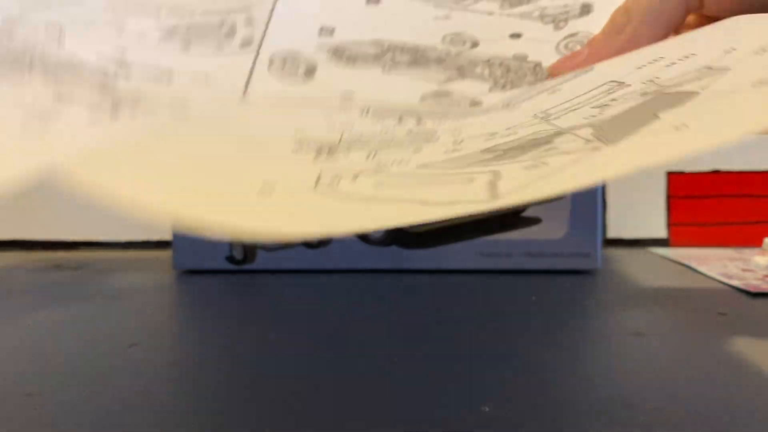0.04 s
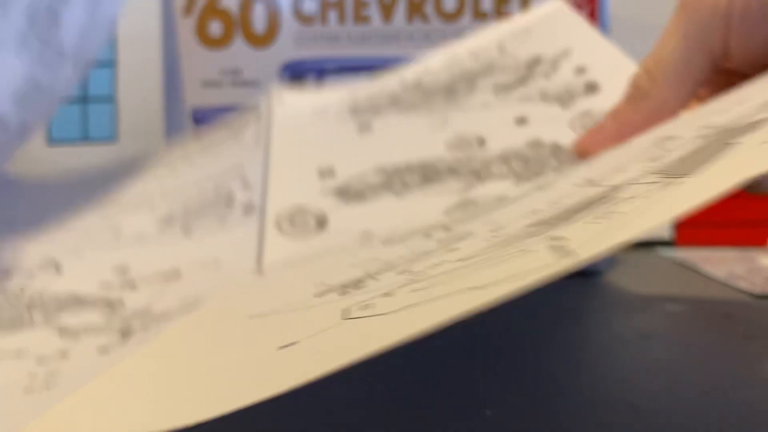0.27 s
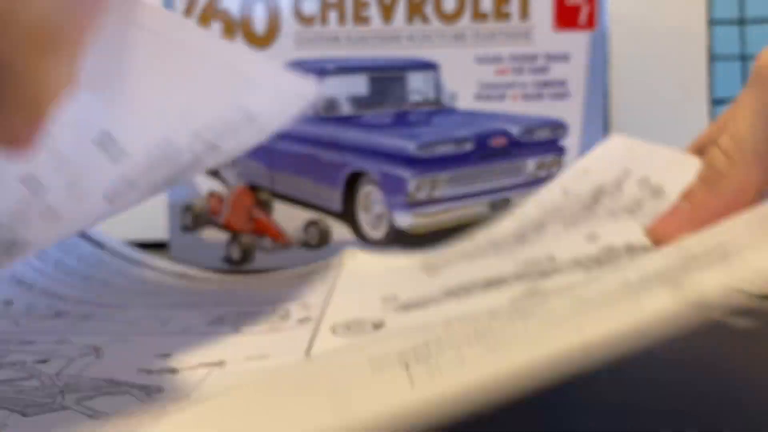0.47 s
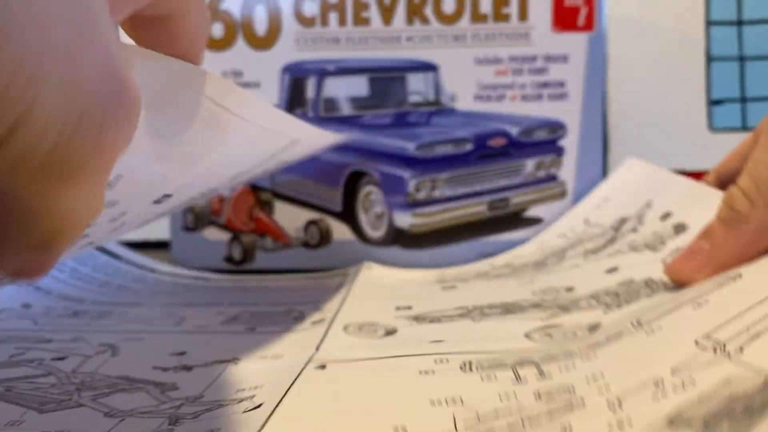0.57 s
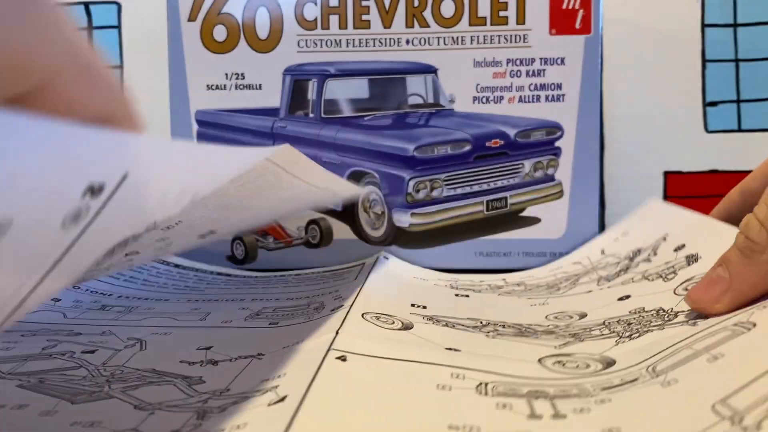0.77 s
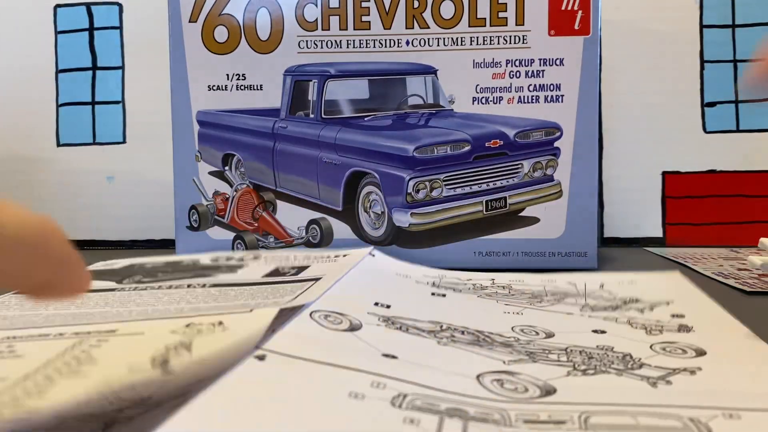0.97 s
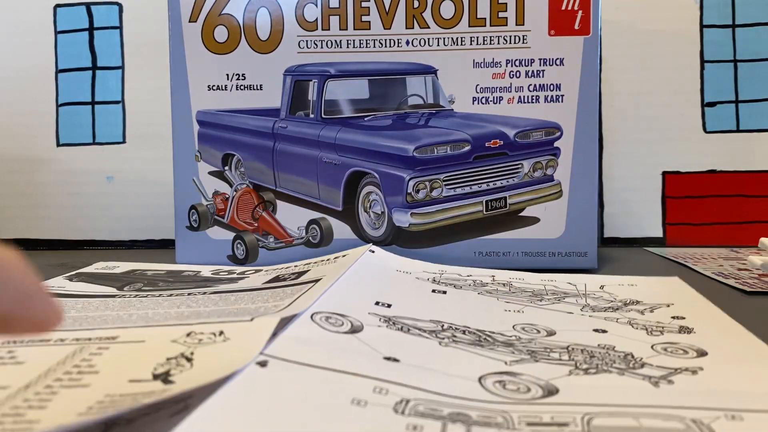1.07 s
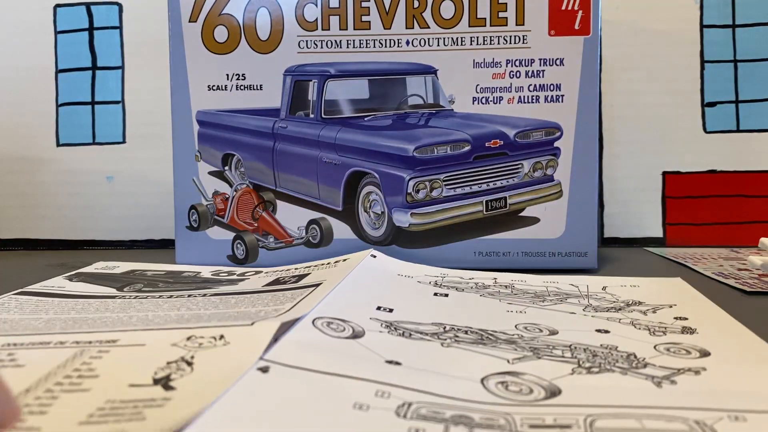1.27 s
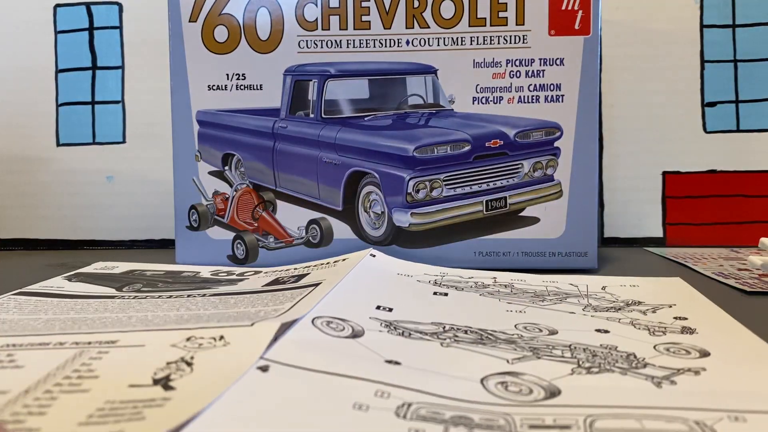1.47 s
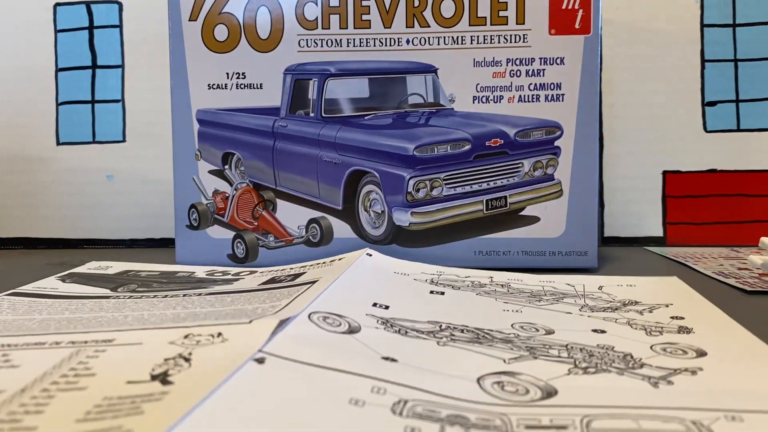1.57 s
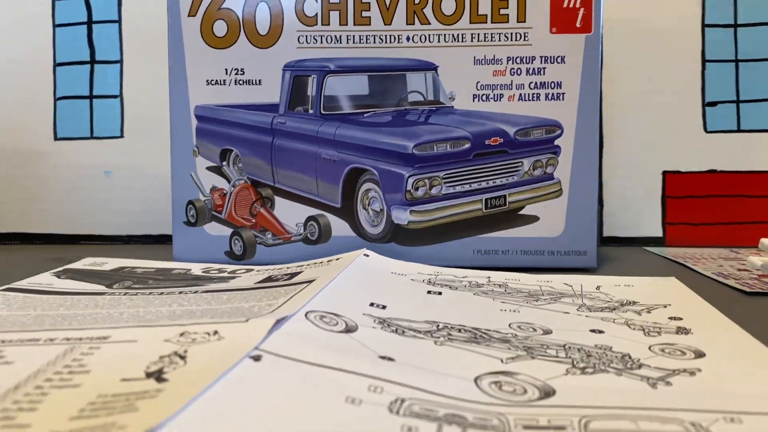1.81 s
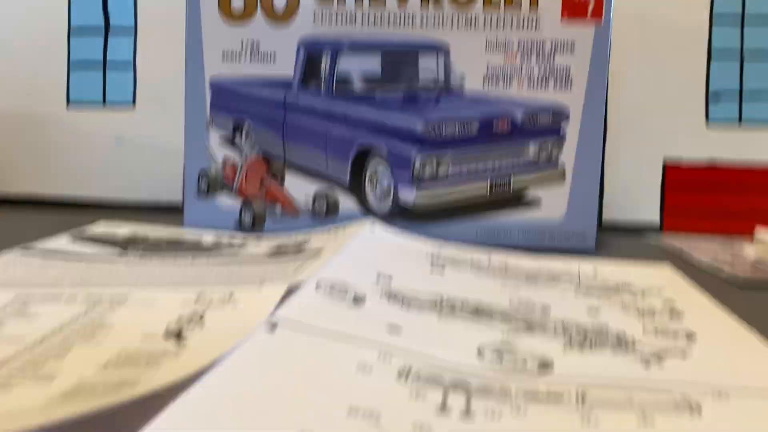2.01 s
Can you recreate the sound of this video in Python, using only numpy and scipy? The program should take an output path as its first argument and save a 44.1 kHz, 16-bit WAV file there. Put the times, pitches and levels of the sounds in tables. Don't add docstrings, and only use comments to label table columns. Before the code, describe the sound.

A stiff folded paper sheet is unfolded close to the microphones, with hissing slides, flapping slaps, crease snaps and low table thuds, then thin settling ticks and a brief last rustle in a quiet small room.

```python
import sys
import numpy as np
from scipy import signal
from scipy.fft import rfft, irfft
from scipy.io import wavfile
from scipy.ndimage import uniform_filter1d

SR = 44100
rng = np.random.default_rng(int(sys.argv[2]) if len(sys.argv) > 2 else 0)


def makeup_ratio(level_db):
    decades = np.asarray(level_db, float) / 20
    return 10 ** decades


def to_wav(sig):
    pcm = np.clip(np.atleast_2d(sig), -1, 1) * 32767
    pcm = np.round(pcm).astype(np.int16)
    wavfile.write(sys.argv[1], SR, pcm.T)


N = 90404
HZ = np.fft.rfftfreq(N, 1 / SR)
T = np.arange(N) / SR


def evened(x):
    return x / np.sqrt(np.mean(x ** 2) + 1e-20)


def read(points, hz):
    f, value = np.transpose(points)
    return np.interp(np.log(hz + 1), np.log(f + 1), value)


def follow(curve, share):
    s, db = np.transpose(curve)[:2]
    return makeup_ratio(db.max() + share * (np.interp(T, s, db) - db.max()))


# (time [s], left over right [dB])
LEAN = [
    (0, 5),
    (1.3, 10),
    (1.55, 1.5),
    (2.05, 0.5),
]


def lean(width):
    return makeup_ratio(width * np.outer([.5, -.5], np.interp(T, *np.transpose(LEAN))))


def add(mix, s, sound, width=0.68):
    pan_db = width * np.interp(s, *np.transpose(LEAN))
    part = mix[:, round(s * SR):][:, :sound.shape[-1]]
    part += sound[..., :part.shape[1]] * makeup_ratio(np.array([[pan_db / 2], [-pan_db / 2]]))


# (frequency [Hz], coherence [0-1])
SAME = [(60, 1), (150, 0.77), (400, 0.68), (1000, 0.077), (2500, 0.5), (5000, 0.48)]


def grains(colour, per_s, spread_db, clump_db, clump_s):
    clump = evened(uniform_filter1d(rng.standard_normal(N), size=max(int(clump_s * SR), 1)))
    size_db = spread_db * np.minimum(rng.exponential(1, N), 4) + clump_db * clump
    size = makeup_ratio(size_db) * (rng.random(N) < per_s / SR)
    left, other = rfft(size * rng.standard_normal((2, N)))
    same = np.clip(read(SAME, HZ), 0, 1)
    right = same * left + np.sqrt(1 - same ** 2) * other
    return evened(irfft(np.array([left, right]) * makeup_ratio(read(colour, HZ)), N))


# (frequency [Hz], level [dB])
AIR = [(30, -17), (70, 29), (150, 3), (350, -57), (1200, -16), (3500, 11), (7000, 0), (16000, -23)]


def room_air():
    return makeup_ratio(-65) * grains(AIR, per_s=SR, spread_db=0, clump_db=.7, clump_s=.05)


# (time [s], length [s], change [dB])
JERKS = [(.028, 0.013, 2), (0.099, 0.013, 3), (.118, 0.032, -6.5), (0.15, 0.011, 0), (.165, 0.026, -4),
         (0.196, 0.0083, 7), (0.217, 0.011, -6.5), (0.232, 0.017, 4), (0.272, 0.011, 3.5),
         (0.295, 0.015, -6), (0.342, .04, 2), (0.419, 0.024, 5), (0.461, 0.051, -5), (0.508, 0.011, -6),
         (0.543, .03, 2), (0.69, 0.023, 0.5), (0.711, 0.018, -6), (0.743, 0.012, -0.5), (0.871, 0.05, -1.5),
         (0.902, 0.026, 5), (1.001, 0.0069, 3.5), (1.55, 0.042, -4.5), (1.594, 0.05, -1),
         (1.695, 0.013, -3.5), (1.715, .012, 5.5), (1.965, 0.015, 3)]


def jerks():
    change_db = 0
    for s, length, db in JERKS:
        inside_s = np.minimum(T - s, s + length - T)
        change_db = change_db + db * np.clip(inside_s / .003 + .5, 0, 1)
    return makeup_ratio(change_db)


# (time [s], level [dB], brightness [dB per octave])
SLIDE = [(0, -55.5, -6.5), (.05, -50.5, -2.5), (.33, -48, -0.5), (.355, -44.5, 0), (.44, -45, -1),
         (.62, -45, -3), (.7, -43, 0), (.84, -41, -2), (.89, -46, -1), (.93, -46, -3.5), (.95, -53.5, -2),
         (1.15, -65, -2), (1.51, -54.5, -3), (1.58, -53.5, -3.5), (1.63, -48, -3), (1.74, -57, -6),
         (1.79, -73, -9.5), (1.89, -55, -0.5)]
# (frequency [Hz], level [dB])
HISS = [(300, -2), (900, -1), (1500, -3.5), (2300, 1), (3500, 0.5), (7000, -1.5), (10000, -2), (16000, -8)]


def slide():
    hiss = grains(HISS, per_s=20000, spread_db=1.8, clump_db=1.5, clump_s=.01)
    hz, t, z = signal.stft(hiss, SR, nperseg=256)
    patches = rng.standard_normal((len(t), len(hz))).T
    patches = uniform_filter1d(patches, size=9, axis=0)
    patches = evened(uniform_filter1d(patches, size=14, axis=1))
    s, _, brightness = np.transpose(SLIDE)
    octaves = np.log2(np.maximum(hz, 1000) / 5000)[:, None]
    tilt_db = np.interp(t, s, brightness) * octaves
    hiss = signal.istft(z * makeup_ratio(1.9 * patches + tilt_db), SR, nperseg=256)[1][:, :N]
    return makeup_ratio(3) * follow(SLIDE, 1.141) * jerks() * lean(0.49) * hiss


# (time [s], level [dB])
BEND = [(0, -68), (.16, -36.5), (.33, -40.5), (.41, -29), (.62, -55.5), (.72, -25.5), (.84, -42.5),
        (1.02, -38), (1.1, -62.5), (1.54, -52), (1.64, -37.5), (1.78, -41), (1.84, -57), (1.93, -38),
        (2.05, -65)]
# (frequency [Hz], level [dB])
DRUM = [(28, -35), (45, 0), (72, -1.5), (150, -6), (400, -18), (800, -21.5), (1500, -35.5), (4000, -53)]


def bend():
    drum = grains(DRUM, per_s=8000, spread_db=1.5, clump_db=2.5, clump_s=.025)
    return makeup_ratio(-3.5) * follow(BEND, 1.097) * lean(0.32) * drum


# (time [s], level [dB], length [s], crispness [dB])
FLAPS = [(0.051, -41, 0.074, -9.5), (0.207, -39.5, 0.026, -24), (0.343, -37.5, 0.029, -8),
         (0.383, -28.5, 0.024, -1.5), (0.442, -35, 0.024, 2), (0.481, -30, 0.041, -2.5),
         (0.626, -33, 0.011, -6), (0.666, -34, 0.012, -3), (0.687, -27, 0.026, 2),
         (0.739, -31.5, 0.014, 0.5), (0.848, -35, 0.013, -14), (0.906, -41, 0.027, 5.5),
         (0.95, -40, 0.015, -36), (1.278, -33.5, 0.014, -12), (1.608, -44.5, 0.048, 6),
         (1.716, -43, 0.029, -2.5), (1.874, -44, 0.019, -3), (1.952, -44.5, 0.015, -8)]
# (frequency [Hz], level [dB])
SLAP = [(80, -6), (200, 1), (400, 2), (700, -1.5), (1200, -8.5), (2500, -18.5), (16000, -80)]
# (frequency [Hz], level [dB])
CRISP = [(700, -89), (1500, -1.5), (2300, 4.5), (3300, -9), (5000, -6.5), (16000, -22.5)]


def flaps():
    slap = grains(SLAP, per_s=6000, spread_db=1.3, clump_db=2, clump_s=.004)
    crisp = grains(CRISP, per_s=9000, spread_db=1.8, clump_db=2.5, clump_s=.003)
    out, t = np.zeros((2, N)), np.arange(3500) / SR
    for s, db, length, crisp_db in FLAPS:
        fall_db = -4 * t / length - 400 * np.maximum(t - length, 0)
        shape = np.minimum(t / 0.0045, 1) * makeup_ratio(fall_db)
        at = round(max(s, 0) * SR)
        dull = evened(slap[:, at:at + 3500])
        crackle = makeup_ratio(crisp_db - 5) * evened(crisp[:, at:at + 3500])
        add(out, max(s, 0), makeup_ratio(db) * shape * (dull + crackle))
    return out


# (time [s], peak [dB], ring [Hz], length [s], clean ring share [0-1])
SNAPS = [(0.054, -37, 1070, .006, 0.8), (0.208, -32.5, 3510, 0.0036, 0.6),
         (0.208, -25.5, 2290, 0.0056, 0.97), (0.301, -26.5, 1085, 0.0096, 0.32),
         (.302, -35, 506, 0.0045, 0.05), (.392, -21.5, 2130, 0.0076, 0.38), (.479, -18, 2150, 0.0058, 0.5),
         (0.634, -36, 1580, 0.0039, 0.8), (0.856, -28.5, 2450, 0.0022, 0.8), (.858, -25, 430, 0.0045, .5),
         (0.925, -26.5, 2370, 0.0028, 0.45), (0.982, -50, 1980, 0.0027, 0.5),
         (1.003, -34, 2250, 0.0035, 0.41), (1.281, -32.5, 610, 0.0026, 1), (1.292, -36, 2350, 0.0025, 0.73),
         (1.2977, -39, 2270, 0.0027, 0.7), (1.486, -31.5, 2260, 0.0015, 0.64),
         (1.531, -37.5, 1250, 0.0022, 0.3), (1.551, -45, 4400, .002, .7),
         (1.612, -30.5, 1900, 0.0039, 0.44), (1.631, -33.5, 2960, 0.0033, 0.85),
         (1.642, -39, 1080, 0.0077, 0.67), (1.68, -34, 1800, 0.004, 0.88),
         (1.682, -31.5, 2880, 0.0024, 0.6), (1.683, -40, 5700, 0.0021, 0.5), (1.692, -39, 1760, 0.003, 0.9),
         (1.7235, -17.5, 3160, 0.0017, 0.58), (1.724, -25.5, 1420, 0.0033, 0.66),
         (1.724, -35, 2390, 0.0036, 1), (1.725, -25.5, 388, 0.009, 0.13),
         (1.740, -19.5, 1500, 0.0016, 0.42), (1.880, -39, 1300, 0.0023, 0)]


def snaps():
    out, t = np.zeros((2, N)), np.arange(1500) / SR
    click = 5 * (np.arange(len(t)) == 10)
    for s, db, hz, length, clean in SNAPS:
        length, clean = max(length, .001), np.clip(clean, 0, 1)
        noise = rng.standard_normal((3, len(t)))
        shape = np.minimum(t / 0.0011, 1) * np.exp(-(t / length) ** 2)
        wander = 0.0029 * np.cumsum(noise[2])
        ring = np.sin(2 * np.pi * (hz * t + wander + np.array([[0], [.08]])))
        push = noise[0] + noise[:2] * [[0], [1]] + click
        band = signal.butter(2, [hz * 0.26, hz * 1.73], "band", fs=SR)
        wake = evened(signal.lfilter(*band, push))
        add(out, s, makeup_ratio(db) * shape * (clean * ring + .5 * (1 - clean) * wake))
    return out


def room(x):
    t = np.arange(9000) / SR
    dull = signal.lfilter([.4], [1, -.6], rng.standard_normal((2, 9000)))
    tail = dull * makeup_ratio(-60 * t / 0.26) * (t > .003)
    return signal.fftconvolve(x, tail / np.linalg.norm(tail[0]), axes=1)[:, :N]


# (time [s], peak [dB], frequency [Hz], t60 [s])
THUDS = [(0.208, -28, 140, 0.033), (0.35, -35, 81, 0.15), (0.39, -20.5, 60, 0.11),
         (0.456, -26.5, 78.6, 0.23), (0.548, -30, 57, 0.17), (0.693, -22, 74.7, 0.28),
         (0.744, -26, 88, 0.074), (0.858, -27, 96, 0.087), (0.946, -26, 61.6, 0.15),
         (1.015, -29.5, 70.4, 0.079), (.672, -24, 460, 0.049), (.921, -32, 489, 0.065),
         (.962, -29, 168, 0.058), (1.284, -28.5, 133, 0.093), (1.2841, -32.5, 234, 0.062),
         (1.297, -31, 66.6, 0.11), (1.434, -38.5, 138, 0.081), (1.454, -41, 70, 0.11),
         (1.723, -32.5, 119, 0.096), (1.756, -28, 108.4, 0.12), (1.879, -32.5, 109, 0.16),
         (1.964, -30.5, 71, 0.13), (1.963, -44, 442, 0.052), (1.726, -35.5, 222, 0.069)]


def thuds():
    out, t = np.zeros((2, N)), np.arange(12000) / SR
    sag = 0.72 * 0.0072 * (1 - np.exp(-t / 0.0027))
    for s, db, hz, t60 in THUDS:
        shape = makeup_ratio(db - 60 * t / t60) * np.minimum(t / 0.0045, 1)
        tone = np.sin(2 * np.pi * hz * (t + sag) + np.array([[.17], [-.17]]))
        add(out, s, shape * tone, width=.06)
    return out


# (time [s], peak [dB], lowest frequency [Hz])
TICKS = [(.855, -32, 1155), (1.115, -43, 8050), (1.477, -33.5, 3250), (1.4873, -33.5, 900),
         (1.499, -33, 8000), (1.5144, -37, 8000), (1.526, -40, 8000), (1.531, -46, 700), (1.537, -40, 8000),
         (1.553, -45, 3800), (1.596, -50, 2500), (1.61, -34, 6000), (1.622, -41, 700), (1.638, -34, 5000),
         (1.681, -30, 2400), (1.7124, -40, 6000), (1.718, -42, 3000), (1.723, -34.5, 1490),
         (1.747, -41, 7000), (1.855, -53, 2500), (1.8756, -35, 890), (1.928, -43, 990)]


def ticks():
    out, t = np.zeros((2, N)), np.arange(300) / SR
    for s, db, hz in TICKS:
        burst = rng.standard_normal(300) * np.exp(-t / 0.00084)
        band = signal.butter(2, [hz, min(5 * hz, .45 * SR)], "band", fs=SR)
        click = signal.lfilter(*band, burst)
        add(out, s, makeup_ratio(db) * click / abs(click).max())
    return out


def scene():
    hits = flaps() + snaps() + ticks()
    return room_air() + slide() + bend() + hits + makeup_ratio(-20) * room(hits) + thuds()


def top_cut(x):
    return signal.sosfilt(signal.butter(12, 16990, fs=SR, output="sos"), x)


OPENING_S = [
    1.115,
    1.477,
    1.487,
    1.683,
    1.747,
]


def record(dry):
    join_hz, step_hz, edge_hz = 7000, 2125, 15900
    flat = .26
    hz, t, z = signal.stft(dry, SR, nperseg=512)
    row_hz = hz[:, None]
    drift = np.repeat(rng.standard_normal((len(t), 5)), 8, axis=0)[:len(t)].T
    steps = np.clip((row_hz - join_hz) / step_hz, 0, 4)
    steps = np.clip(steps + .055 * drift[np.round(steps[:, 0]).astype(int)], 0, 4)
    turns = np.floor(steps) + np.clip((steps % 1 - flat) / (1 - 2 * flat), 0, 1)
    high = np.clip((row_hz - join_hz) / 600 + 1.7, 0, 1)
    sharp = (abs(t[:, None] - np.array(OPENING_S)) < .006).any(axis=1)
    lag = 1.21 * np.exp(-np.log2(row_hz / 600 + 1e-9) ** 2)
    turned = z[0] * np.exp(1j * np.pi * np.where(sharp, steps, turns))
    z[1] = (1 - high) * np.exp(-1j * lag) * z[1] + high * turned
    z *= makeup_ratio(-.4 * np.maximum(row_hz - edge_hz - 600 * sharp, 0))
    mix = signal.istft(z, SR, nperseg=512)[1][:, :N]
    return top_cut(mix)


dry = scene()
out = record(dry)
to_wav(out)
```